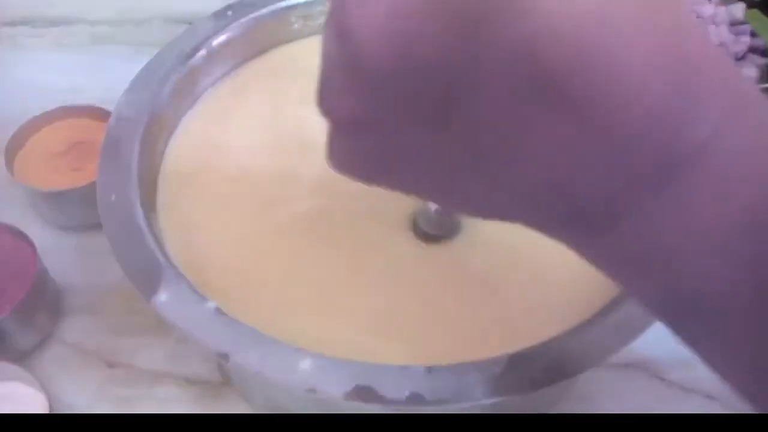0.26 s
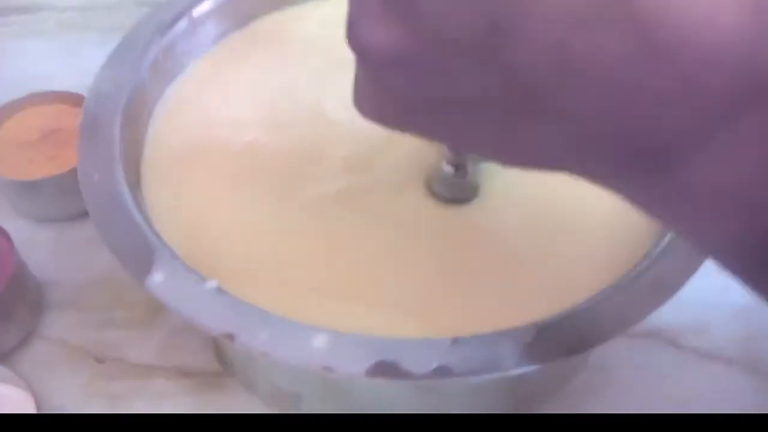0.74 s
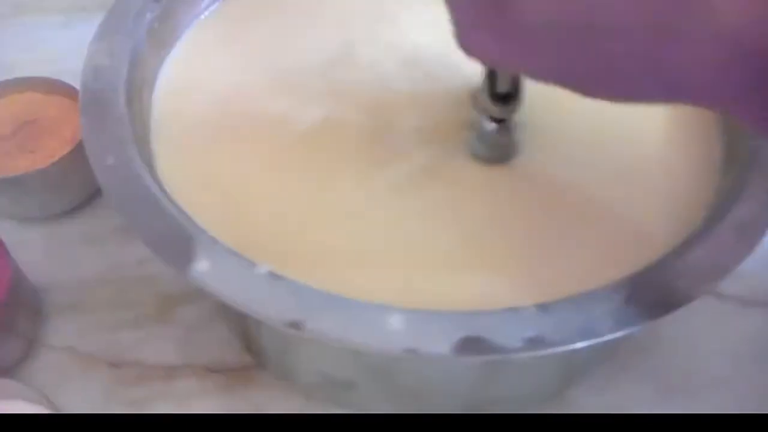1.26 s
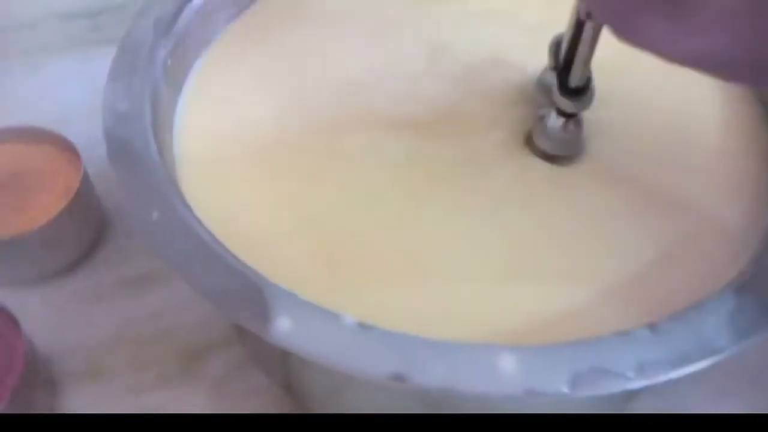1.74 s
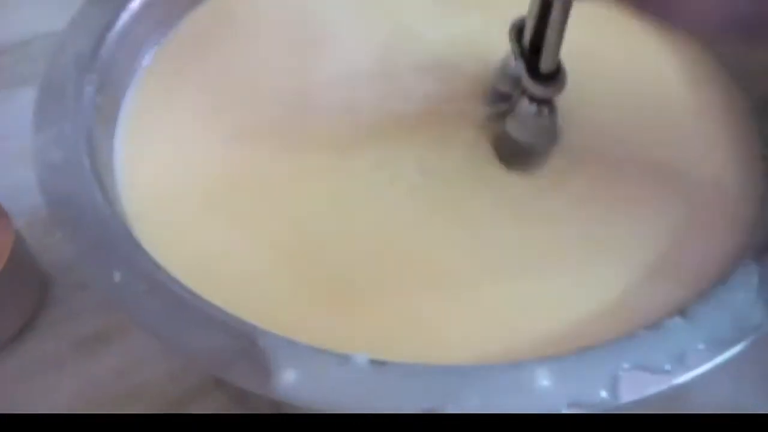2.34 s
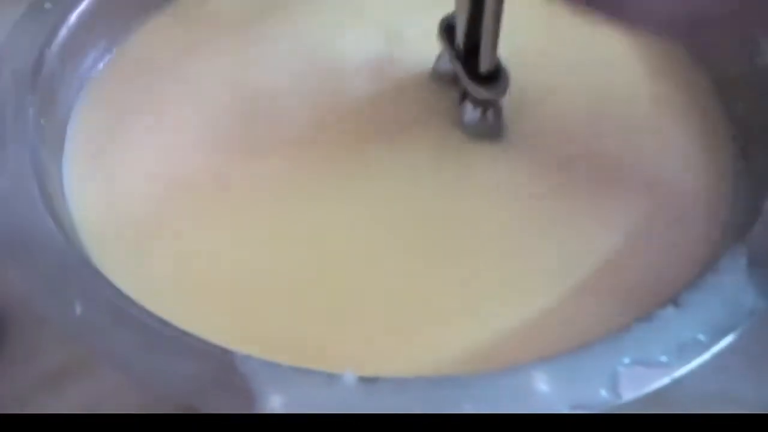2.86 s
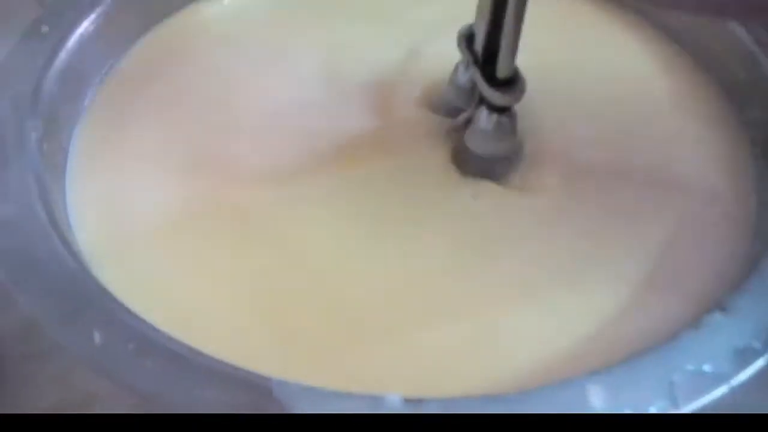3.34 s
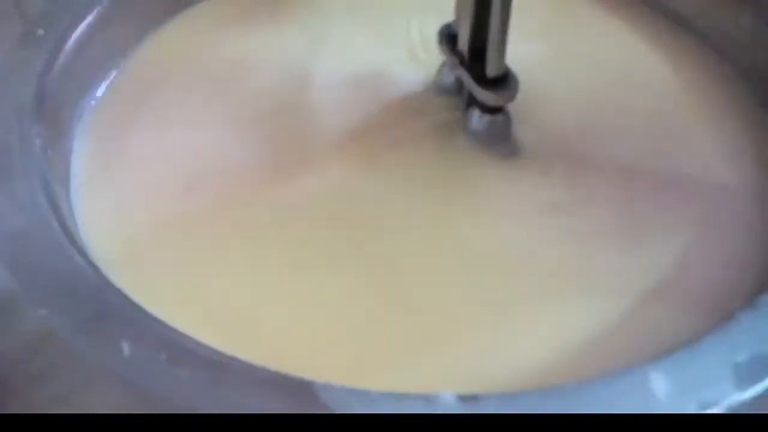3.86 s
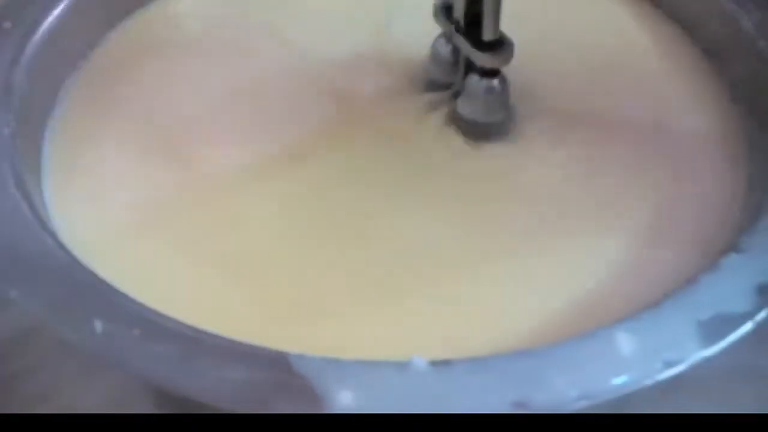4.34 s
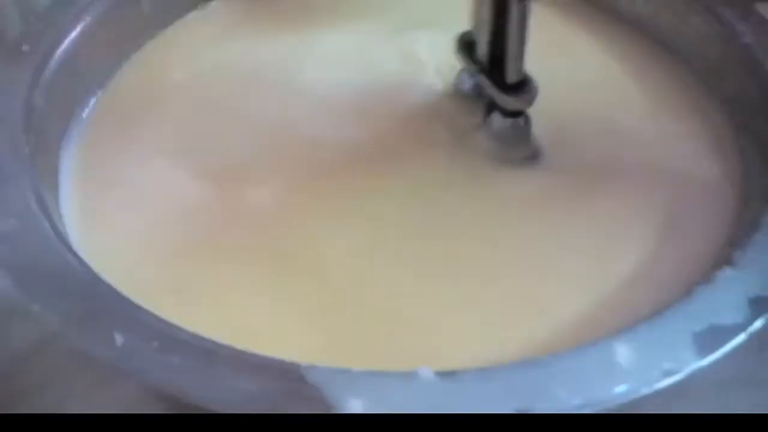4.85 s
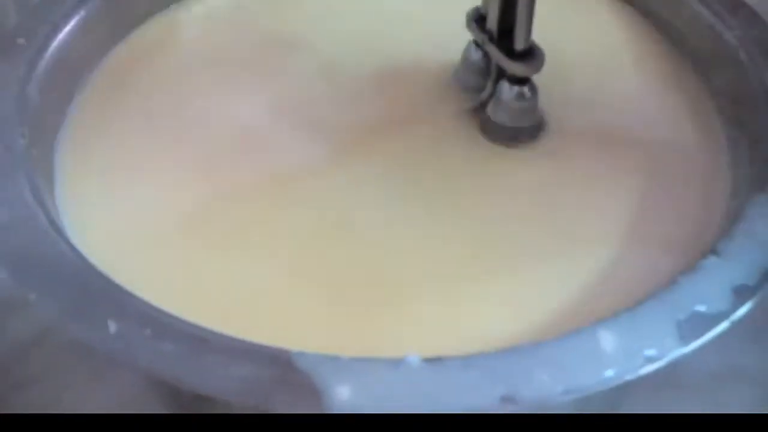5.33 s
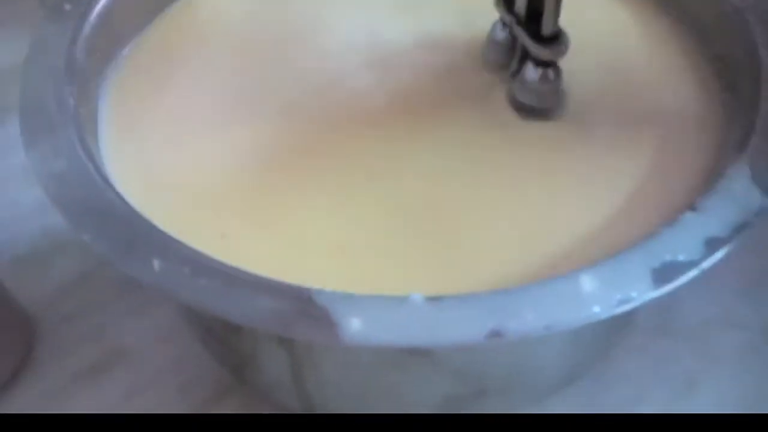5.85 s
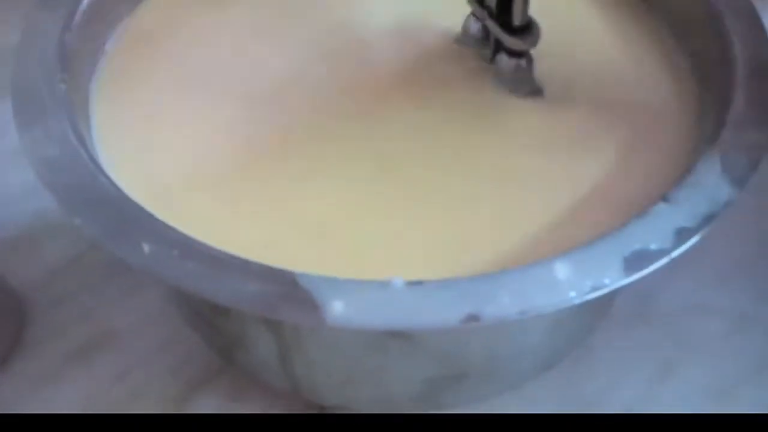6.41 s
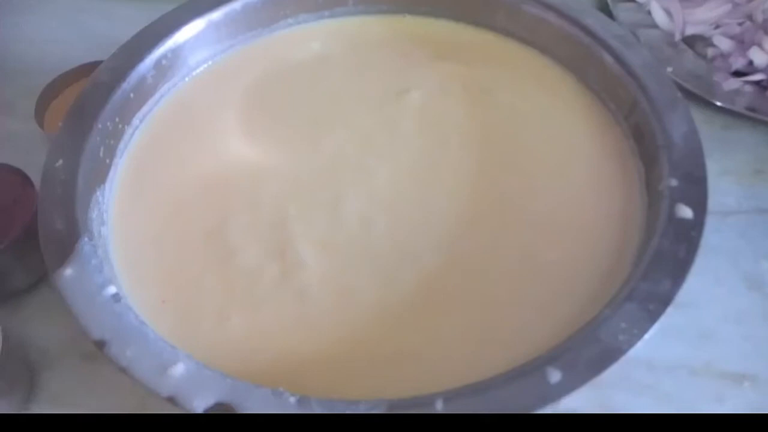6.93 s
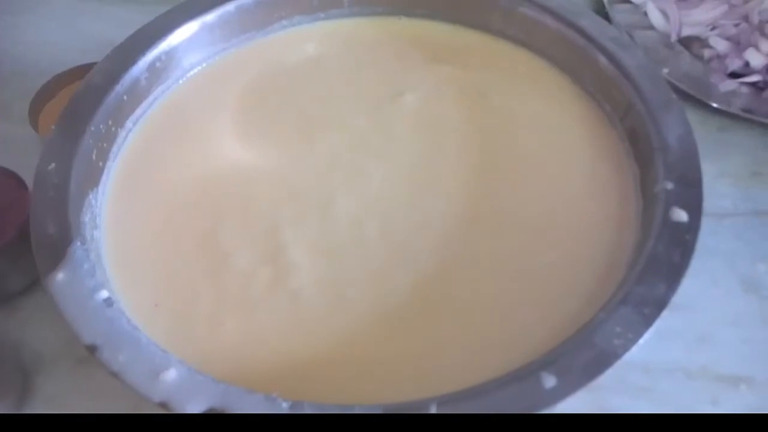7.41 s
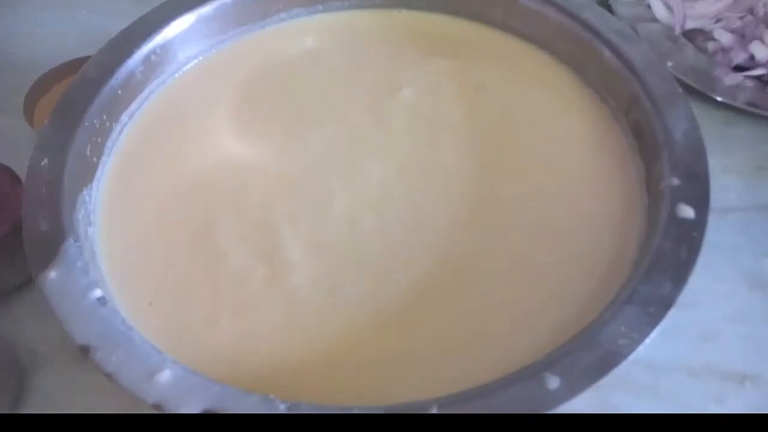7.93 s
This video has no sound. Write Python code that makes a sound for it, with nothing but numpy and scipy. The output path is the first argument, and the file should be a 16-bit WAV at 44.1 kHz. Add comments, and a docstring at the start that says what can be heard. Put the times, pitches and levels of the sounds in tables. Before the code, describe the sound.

From the very start, a hand-cranked beater spins in a steel bowl of thin batter, close to a small microphone in a kitchen. Its loose shafts knock about thirteen times a second, in uneven groups of four or five, mixing light ticks with hard, bright clacks that briefly ring the bowl. A gear rattle swells with each push of the crank and grows slightly stronger after 2 seconds. Underneath are a faint wet churn, a faint low drone from the bowl and occasional soft, dull bumps as the whisk touches the bottom. Three very faint, distant coos, perhaps from a dove, come at about 3.7, 4.7 and 5.7 seconds. At about 6.5 seconds the beater cuts off abruptly. A soft steady hiss and a low hum, present throughout, continue alone until the end at around 8 seconds.

```python
"""A kitchen, where a hand beater spins in a steel bowl of thin batter, close to a small microphone.
Its loose shafts knock four or five times per turn of the crank and rebound, exciting the resonances of
frame and bowl. The gear rattle swells with each push, over a wet churn, until the beater's sound is cut
off abruptly. Hiss and a low hum go on throughout, with a few faint, far coos, perhaps of a dove.
The resonances of the microphone's port give the treble its peaks."""
import sys
import numpy as np
from scipy import signal
from scipy.fft import rfft, irfft
from scipy.io import wavfile
from scipy.ndimage import uniform_filter1d

SR = 44100
rng = np.random.default_rng(int(sys.argv[2]) if len(sys.argv) > 2 else 0)


def master(y):
    """Save y as 16-bit WAV."""
    cut = np.clip(np.atleast_2d(y).T, -1, 1)
    pcm = np.round(cut * 32767)  # scale
    wavfile.write(sys.argv[1], SR, pcm.astype(np.int16))


N = 360605
TIME = np.arange(N) / SR
FREQS = np.arange(N // 2 + 1) * SR / N

# spectrum of the kitchen's hiss: (frequency [Hz], relative level [dB])
HISS_SPECTRUM = [(25, -19), (65, 0.5), (140, -4), (220, 4.5), (350, 6.5), (480, 4.5), (650, 1.5),
                 (1200, 2.5), (2200, 2), (4600, 3.5), (6000, -6), (8500, -2), (10500, -4), (16000, 0.5)]
# tones of the hum: (frequency [Hz], level [dB])
HUM_TONES = [(96.5, -59.5), (383, -63.5)]
# gear rattle before the push is added: (time [s], level [dB])
GEAR_LEVEL = [(0, -26.5), (.1, -38.5), (.3, -34), (.8, -34.5), (1.3, -35), (1.8, -33), (2.1, -32.5),
              (2.7, -32), (3.3, -32), (3.7, -31.5), (4.0, -31), (4.4, -32.5), (4.9, -30), (5.3, -30.5),
              (5.8, -34), (6.2, -30.5), (6.5, -33.5)]
# spectrum of gears and light taps: (frequency [Hz], relative level [dB])
RATTLE_SPECTRUM = [(60, -14.5), (250, -9.5), (550, -10.5), (1050, -3), (1450, -6.5), (1780, 1.5),
                   (2100, -5), (2400, -1.5), (2850, 3.5), (3300, -1.5), (5000, 4.5), (6500, 6), (8000, 1),
                   (16000, 4.5)]
# the treble opens and closes over time: (time [s], gain [dB])
TREBLE_OPENING = [(0, -4), (1.3, -2), (1.5, -0.5), (3.3, 1), (3.6, 2.5), (4.3, -0.5), (5.1, 0.5), (6.5, -1)]
# low drone of the bowl: (time [s], level [dB])
DRONE_LEVEL = [(0, -62.5), (2.8, -55), (4.2, -55), (6.5, -56.5)]
# knocks of the shafts: (time [s], level [dB], leading resonance [Hz], time to the rebound [ms])
SHAFT_KNOCKS = [(0.034, -26.5, 2900, 6.3), (0.1655, -17.5, 2750, 0.84), (0.2332, -17.5, 2360, 2.2),
                (0.3139, -12, 2456, 10.7), (0.398, -19, 2880, 1.3), (0.4917, -26.5, 2750, 13.5),
                (0.5673, -16.5, 2820, 2.5), (0.6296, -15, 2850, 11.7), (0.7112, -16.5, 2820, 8.1),
                (0.792, -15.5, 2360, 6), (0.8698, -16, 2730, 1.2), (0.9278, -15.5, 2380, 5.8),
                (1.0028, -12, 2650, 16), (1.0998, -25, 2290, 6.5), (1.1825, -17.5, 2860, 0.89),
                (1.2474, -14.6, 2730, 1), (1.3189, -13, 2730, 8.1), (1.4035, -16, 3440, 1.8),
                (1.5022, -27.5, 2440, 3.1), (1.5694, -16.5, 2400, 1.2), (1.6314, -18.0, 2440, 7.2),
                (1.711, -13.5, 3100, 12.3), (1.7992, -21.9, 3050, 1.0), (1.8788, -19, 2910, 0.69),
                (1.9429, -16, 2420, 4.9), (2.015, -10, 2750, 3), (2.0792, -25, 3180, 18),
                (2.0975, -23.5, 3600, 3.7), (2.18, -18, 2830, 0.92), (2.251, -13.5, 3620, 1.0),
                (2.3144, -12, 2620, 0.88), (2.3786, -14, 3320, 18), (2.4562, -22.4, 2780, 7.3),
                (2.548, -16.5, 2670, 0.99), (2.6138, -14, 2900, 0.85), (2.674, -26, 3230, 6.6),
                (2.6934, -14, 2580, 1.0), (2.7522, -10, 2755, 4.1), (2.838, -15, 2530, 1),
                (2.9031, -15, 2860, 0.91), (2.97, -9.5, 2850, 16.5), (3.041, -13, 3420, 12),
                (3.133, -17, 2850, 3.2), (3.2062, -21, 2230, 0.92), (3.28, -10, 3510, 1.1),
                (3.3502, -13, 2930, 8.8), (3.5122, -16.5, 2615, 1.0), (3.5797, -17.5, 3440, 1.4),
                (3.6434, -13, 2430, 16.7), (3.7192, -13.5, 2790, 8.4), (3.8047, -16.4, 2900, 2.8),
                (3.8702, -16, 3010, 4.4), (3.9341, -13, 2780, 11), (4.0146, -15, 3000, 2.6),
                (4.0969, -18, 2840, 1.0), (4.1621, -13, 3070, 1.1), (4.2329, -16, 2980, 1.0),
                (4.3116, -18.5, 2810, 5.6), (4.4053, -25.5, 2790, 1.0), (4.4789, -18.5, 2940, 1.9),
                (4.547, -16, 3460, 1.1), (4.631, -13.5, 3100, 1.1), (4.6888, -19, 2470, 1.6),
                (4.791, -27, 2310, 3.1), (4.854, -16, 2920, 7.6), (4.929, -16, 3170, 10),
                (4.9999, -13, 3680, 8.7), (5.091, -29.5, 3000, 3.1), (5.1597, -17.3, 2800, 3.2),
                (5.2273, -18.5, 3540, 1.6), (5.302, -14, 3720, 2.2), (5.3891, -21, 2360, 3),
                (5.4544, -18, 2840, 5.7), (5.5206, -15, 3700, 1.8), (5.5889, -14, 2500, 16.8),
                (5.6633, -14, 2910, 11.4), (5.757, -16, 2700, 6.4), (5.8194, -12.5, 2800, 7.1),
                (5.8961, -14, 2800, 2), (5.954, -8.5, 2880, 11.6), (6.0493, -17.5, 2700, 3.5),
                (6.1172, -15.5, 2920, 1.5), (6.1904, -13, 3430, 1.2), (6.2672, -16.5, 2480, 4),
                (6.349, -24, 2420, 1.0), (6.4188, -16.5, 2910, 1.8), (6.4878, -16, 3430, 3.9)]
# modes of the beater's steel frame: (frequency [Hz], bandwidth [Hz], relative level [dB])
FRAME_MODES = [(1780, 73, -6), (1970, 26, -26), (2295, 280, 0.5), (2670, 93, -9.5), (2890, 62, 0),
               (3380, 900, 2.5), (3560, 130, -3)]
# body of the bowl, damped by the batter: (frequency [Hz], relative level [dB])
BOWL_SPECTRUM = [(30, -14.5), (100, -4), (300, -4), (550, -5), (790, 2.5), (900, -2), (1050, 7),
                 (1200, 3.5), (1500, -5), (1900, -20.5)]
# modes of the bowl's rim: (frequency [Hz], relative level [dB], time to decay by 60 dB [s])
RIM_MODES = [(2260, -14, 0.27), (2373, 16, 0.3), (2500, -24, 0.23), (2590, 1.5, 0.56), (2817, 15.5, 0.24),
             (2780, -3, 0.45)]
# how freely the rim rings: (time [s], gain [dB])
RIM_GAIN = [(0, -2), (1, 1.5), (1.8, -1), (4.5, -9.5), (6.5, -3)]
# the whisk lands on the bottom of the bowl: (time [s], level [dB])
BOWL_BUMPS = [(0.32, -39), (1.013, -35), (1.405, -39), (2.018, -42), (2.317, -33), (3.28, -45),
              (4.014, -45), (5.305, -39), (5.523, -33)]
# far coos: (time [s], duration [s], top pitch [Hz], level [dB])
FAR_COOS = [(3.66, 0.53, 515, -52.5), (4.66, 0.496, 523, -50.5), (5.66, .48, 521, -49.5)]
# broad response of the microphone: (frequency [Hz], gain [dB])
MIC_RESPONSE = [(1400, -2.5), (2300, 2.5), (3300, -1), (4800, 0), (6400, -12), (7300, -18), (11000, -23.5),
                (16000, -25)]
# resonances of its port: (frequency [Hz], half width [Hz], gain [dB])
PORT_RESONANCES = [(2685, 295, 5), (4955, 348, 4), (6330, 450, 8.5), (8780, 550, 7.5), (10370, 420, 6),
                   (13100, 450, 6), (14600, 410, 3.5)]

CUT_S = 6.535  # the beater's sound is cut off here
USUAL_DB, USUAL_HZ, USUAL_GAP_S = -19, 2870, 0.079  # an ordinary knock, and the time to the next
# parts of a knock: (level re the knock [dB], extra gain per dB above the usual knock [dB/dB])
CLACK, TICK, THUD, RING = (-3.2, 0), (1.45, -0.38), (-13, -0.43), (-14.5, 0.061)


def undb(db):
    """Amplitude ratio of a level in decibels."""
    return 10 ** (np.asarray(db) / 20)


def unit(x):
    """Normalisation to rms 1."""
    return x / np.sqrt(np.mean(x ** 2) + 1e-18)


def curve(points, s=TIME):
    """Linear interpolation of a table over time."""
    return np.interp(s, *np.transpose(points))


def slope(points):
    """Linear interpolation of a spectrum in dB over log frequency."""
    hz, db = np.transpose(points)
    return np.interp(np.log(FREQS + 1), np.log(hz), db)


def colour(x, db):
    """Minimum-phase filtering: the response is causal, so attacks stay sharp."""
    cepstrum = irfft(db * np.log(10) / 20, N)
    cepstrum[1:N // 2] *= 2
    cepstrum[N // 2:] = 0
    return irfft(rfft(x) * np.exp(rfft(cepstrum)), N)


def band(x, lo_hz, hi_hz):
    """Steep band-pass filtering."""
    return signal.sosfilt(signal.butter(4, [lo_hz, hi_hz], "band", fs=SR, output="sos"), x)


def resonate(x, hz, width_hz):
    """Second-order resonance, gain 1 at its centre."""
    return signal.lfilter(*signal.iirpeak(hz, hz / width_hz, fs=SR), x)


def noise():
    """White noise."""
    return rng.standard_normal(N)


def walk(rate_hz):
    """Smooth random fluctuation, spread near 1."""
    step = int(SR / rate_hz)
    held = np.repeat(rng.standard_normal(N // step + 1), step)[:N]
    return 1.3 * uniform_filter1d(held, step)


def add(out, s, x):
    """Superposition of x on out at time s."""
    i = max(int(s * SR), 0)
    out[i:i + len(x)] += x[:N - i]


def hiss(level_db=-40.5):
    """Broadband noise of almost constant level forms the kitchen's background."""
    return undb(level_db + 0.18 * walk(3.1)) * unit(colour(noise(), slope(HISS_SPECTRUM)))


def hum():
    """Slight random modulation of amplitude and frequency makes two low tones waver."""
    out = np.zeros(N)
    for hz, db in HUM_TONES:
        amplitude = np.sqrt(2) * undb(db + 2.4 * walk(14))
        pitch_hz = hz * (1 + 0.00534 * walk(6.3))
        out += amplitude * np.sin(2 * np.pi * np.cumsum(pitch_hz) / SR)
    return out


def push(per_knock_db=0.48, per_doubling_db=5, slack_db=3):
    """Driving force on the crank, in dB: high where knocks come hard and fast, slackening before each."""
    s, db = np.transpose(SHAFT_KNOCKS)[:2]
    hardness_db = np.interp(TIME, s, db) - USUAL_DB
    speed = np.interp(TIME, (s[1:] + s[:-1]) / 2, USUAL_GAP_S / np.diff(s))
    gap_fraction = np.interp(TIME, s, np.arange(len(s))) % 1
    return per_knock_db * hardness_db + per_doubling_db * np.log2(speed) + slack_db * (.5 - gap_fraction)


def gears(teeth_hz=150, scatter_db=7.5, tooth_ms=4, rub=0.82, treble_db=2, treble_wander_db=2):
    """Impact and friction: teeth tick unevenly over the rub of the shafts, louder with each push."""
    teeth_passed = np.cumsum(teeth_hz * np.exp(.35 * walk(90))) / SR
    strength = undb(scatter_db * rng.uniform(-0.095, 1, N // 20))[teeth_passed.astype(int)]
    age_ms = (teeth_passed % 1) / teeth_hz * 1000
    ticks = unit(strength * np.exp(-age_ms / tooth_ms))
    excitation = noise() * (ticks + rub) * undb(2 * walk(60))
    rattle = unit(colour(excitation, slope(RATTLE_SPECTRUM)))
    high = band(rattle, 3800, 14400)
    low = signal.sosfilt(signal.butter(4, 3500, fs=SR, output="sos"), rattle)
    tilt = undb(treble_db + curve(TREBLE_OPENING) + treble_wander_db * walk(9.3))
    mix = (unit(low) + 1.92 * tilt * unit(high)) / np.sqrt(1 + tilt ** 2)
    return mix * undb(curve(GEAR_LEVEL) + push())


def batter(churn_db=-55, drone_hz=233, bubble_count=300):
    """Bubbles pop as damped oscillators of rising pitch while the bowl drones at its lowest mode."""
    t = np.arange(SR // 20) / SR
    churn = np.zeros(N)
    for when, pitch, strength in rng.random((bubble_count, 3)):
        hz = 250 * 5 ** pitch
        bubble = np.exp(-t * hz / 4) * np.sin(2 * np.pi * hz * t * (1 + 4 * t))
        add(churn, when * CUT_S, undb(32 * strength) * bubble)
    wavering_hz = drone_hz * (1 + 0.011 * walk(14))
    drone = unit(np.sin(2 * np.pi * np.cumsum(wavering_hz) / SR))
    return undb(churn_db) * unit(churn) + undb(curve(DRONE_LEVEL) + 2 * walk(9.1)) * drone


def taps(tap_db=-29, spread_db=5, decay_ms=3.5, count=200, graze_db=-19, graze_ms=7):
    """Mechanical play lets the shafts tap at random and graze their guide just before each knock."""
    ms = np.arange(SR // 40) / SR * 1000
    fade, approach = np.exp(-ms / decay_ms), np.exp(-ms[::-1] / graze_ms)
    stray, graze = np.zeros(N), np.zeros(N)
    for when, strength in rng.random((count, 2)):
        add(stray, when * CUT_S, undb(spread_db * (2 * strength - 3)) * fade)
    for s, db, *_ in SHAFT_KNOCKS:
        add(graze, s - len(approach) / SR, undb(db + graze_db) * approach)
    envelope = stray * undb(tap_db + push()) + graze * undb(4.2 * walk(400))
    return envelope * undb(curve(TREBLE_OPENING)) * unit(colour(noise(), slope(RATTLE_SPECTRUM)))


def impact(ms, length_ms, rebound_ms, rebound, rise_ms=0.28, tail_ms=7, room_db=-27, room_ms=28):
    """Envelope of an inelastic collision: the blow adds in power to its scrape and weaker rebound."""
    def blow(age_ms):
        """Fast rise and brief contact, then exponential decay in bowl and room."""
        tail = np.exp(-age_ms / tail_ms) + undb(room_db) * np.exp(-age_ms / room_ms)
        return (1 - np.exp(-age_ms / rise_ms)) * (np.exp(-(age_ms / length_ms) ** 2) + tail)

    scrape = 0.72 * (1 - np.exp(-ms / rise_ms)) * (ms < rebound_ms)
    second_blow = blow(np.maximum(ms - rebound_ms, 0))
    return np.hypot(blow(ms), rebound * (scrape + second_blow))


def rim(t, lead_hz, slosh_s, scatter, reach_hz=170):
    """Free vibration of the rim: modes near the knock's leading resonance take most of the energy."""
    hz, db, t60_s = np.transpose(RIM_MODES)[:, :, None]
    weight, detune, phase = scatter
    share = unit(undb(db + 2 * weight) / np.hypot(1, (hz - lead_hz) / reach_hz))
    cycles = hz * (1 + 0.012 * detune) * (t + slosh_s) + phase
    return (share * undb(-60 * t / t60_s) * np.sin(2 * np.pi * cycles)).sum(0)


def knocks(clack_ms=4.7, tick_ms=2.4, thud_ms=14.1, half_rebound_ms=2.2, reflection_ms=1.7,
           lead_db=3, lead_width_hz=200, ping_hz=5000, ping_octaves=0.21):
    """Impact excitation: steel on steel rings frame and bowl. Light knocks tick, hard ones clack."""
    t = np.arange(SR // 5) / SR
    ms = t * 1000
    frame_modes = sum(undb(db) * unit(resonate(noise(), hz, width)) for hz, width, db in FRAME_MODES)
    frame = band(frame_modes, 1450, 3760)
    treble, top = band(noise(), 3840, 7220), band(noise(), 7500, 16200)
    bowl = colour(noise(), slope(BOWL_SPECTRUM))
    contact, chatter = noise(), undb(2 * walk(600))
    slosh_s = np.cumsum(0.03 * walk(250)) / SR  # moving batter detunes the rim
    scatters = rng.standard_normal((len(SHAFT_KNOCKS), 3, len(RIM_MODES), 1))
    lags = (reflection_ms * SR / 1000 * 2 ** rng.uniform(-1, 1, len(SHAFT_KNOCKS))).astype(int)
    out = np.zeros(N)
    for (s, db, hz, rebound_ms), scatter, lag in zip(SHAFT_KNOCKS, scatters, lags):
        span = np.arange(len(t)) + int(s * SR)
        rebound = rebound_ms / (rebound_ms + half_rebound_ms)  # a longer flight returns harder

        def combed(x):
            """Interference with a quick reflection colours each knock in its own way."""
            return unit(x[span] + 0.6 * x[span - lag])

        def burst(x, length_ms):
            """Blow, scrape and rebound share a constant energy, that of 10 ms at rms 1."""
            struck = x * chatter[span] * impact(ms, length_ms, rebound_ms, rebound)
            return struck / np.sqrt(np.sum(struck ** 2) / (0.01 * SR))

        # the point of contact decides which resonance of the frame leads
        narrow = resonate(resonate(contact[span], hz, lead_width_hz), hz, 2 * lead_width_hz)
        lead = np.cos(np.angle(signal.hilbert(narrow)))  # even amplitude, wavering pitch
        clack = burst(combed(frame) + undb(lead_db) * lead, clack_ms)

        ping_shift = 2 ** (ping_octaves * np.tanh(scatter[0, 0, 0]))
        ping = unit(resonate(contact[span], ping_hz * ping_shift, width_hz=250))
        treble_tick = burst(combed(treble) + undb(-1) * ping, tick_ms)
        top_tick = undb(1) * burst(combed(top), 0.86 * tick_ms)
        opening_db = curve(TREBLE_OPENING, s)
        bright_db = opening_db + np.log2(hz / USUAL_HZ)  # higher knocks are brighter, 1 dB per octave
        tick = undb(bright_db) * (treble_tick + top_tick)

        thud = undb(0.7 * opening_db) * burst(combed(bowl), thud_ms)
        ring_gain = undb(curve(RIM_GAIN, s)) * rebound  # a strong rebound feeds the rim more
        ring = ring_gain * rim(t, hz, slosh_s[span], scatter) * chatter[span] * (1 - np.exp(-ms / 2))
        for sound, (part_db, growth) in zip((clack, tick, thud, ring), (CLACK, TICK, THUD, RING)):
            add(out, s, undb(db + part_db + growth * (db - USUAL_DB)) * sound)
    return out


def bumps(decay_ms=14, top_hz=330):
    """Damped impact: the whisk lands on the bottom and the bowl bumps dully on the counter."""
    ms = np.arange(SR // 10) / SR * 1000
    pulse = (1 - np.exp(-ms)) * np.exp(-ms / decay_ms)
    envelope = np.zeros(N)
    for s, db in BOWL_BUMPS:
        add(envelope, s, undb(db) * pulse)
    return envelope * unit(band(noise(), 30, top_hz))


def coos(pitch_drop=0.1036):
    """Frequency and amplitude modulation: each far coo is a soft tone that arches in pitch and level."""
    out = np.zeros(N)
    for s, length_s, top_hz, db in FAR_COOS:
        arch = np.sin(np.linspace(0, np.pi, int(length_s * SR))).clip(0)
        swell = np.sqrt(2 * arch) * undb(db + 3.2 * walk(32.6)[:len(arch)])
        pitch_hz = top_hz * (1 - pitch_drop * (1 - arch))
        add(out, s, swell * np.sin(2 * np.pi * np.cumsum(pitch_hz) / SR))
    return out


def scene():
    """Superposition of the sources: the beater's sound is cut off abruptly; hiss and hum go on."""
    gate = np.clip((CUT_S - TIME) / 0.0093 + .5, 0, 1)
    beater = knocks() + bumps() + gears() + taps() + batter()
    return (gate * beater + hiss() + hum() + coos())[None]


def record(dry, top_hz=15800):
    """Port resonances colour the treble, saturation rounds the loudest knocks, a low-pass cuts the top."""
    peaks_db = sum(db * np.exp(-((FREQS - hz) / width) ** 2) for hz, width, db in PORT_RESONANCES)
    coloured = colour(dry[0], slope(MIC_RESPONSE) + peaks_db)
    rounded = coloured / (1 + coloured ** 8) ** (1 / 8)
    return signal.sosfilt(signal.ellip(10, .2, 70, top_hz, fs=SR, output="sos"), rounded)[None]


dry = scene()
out = record(dry)
master(out)
```